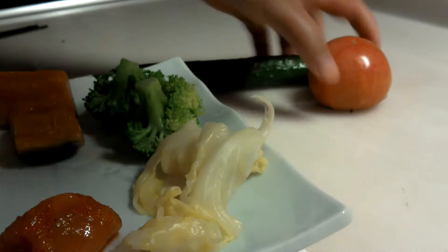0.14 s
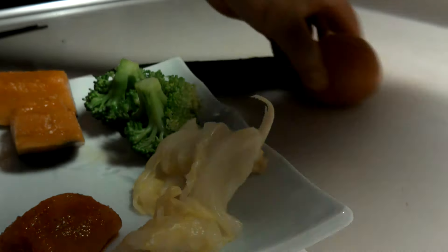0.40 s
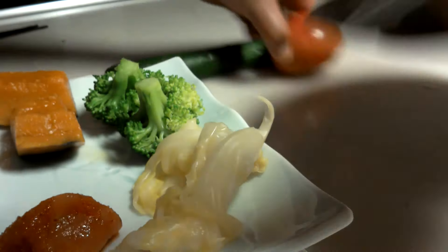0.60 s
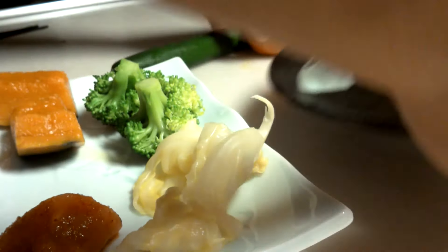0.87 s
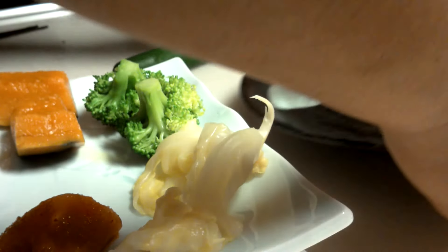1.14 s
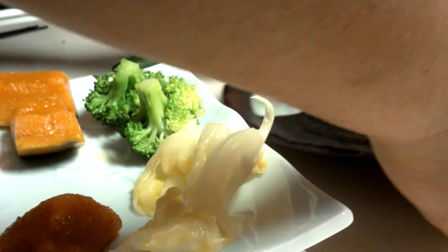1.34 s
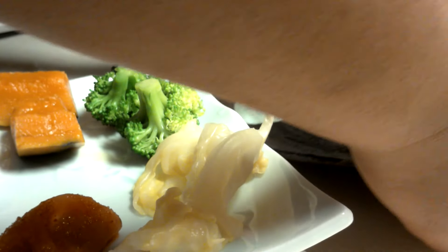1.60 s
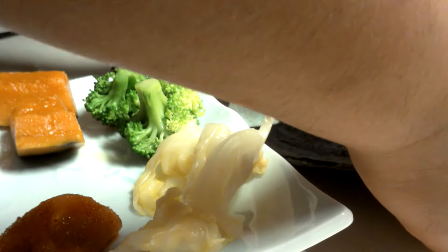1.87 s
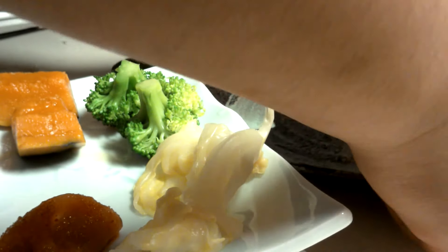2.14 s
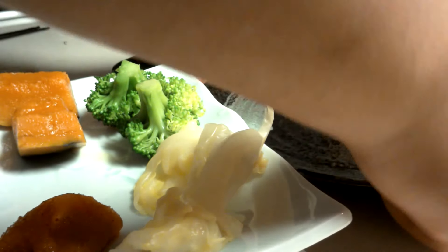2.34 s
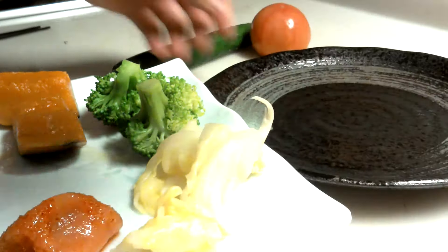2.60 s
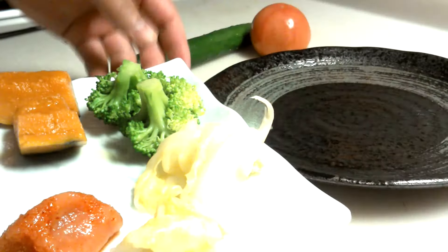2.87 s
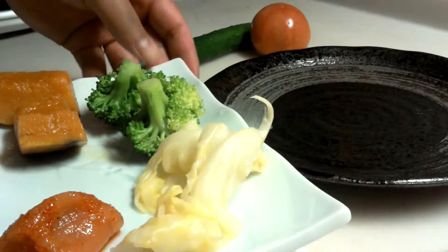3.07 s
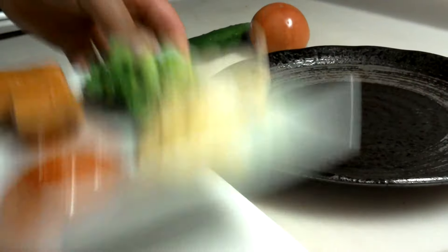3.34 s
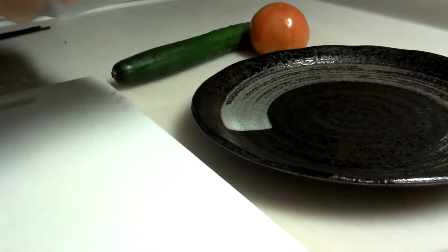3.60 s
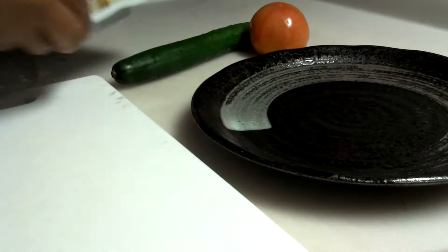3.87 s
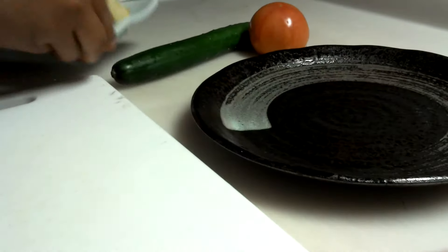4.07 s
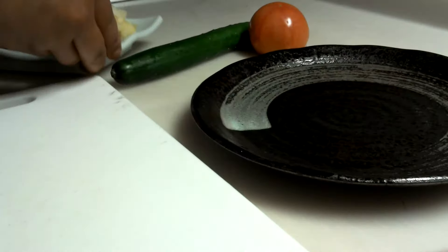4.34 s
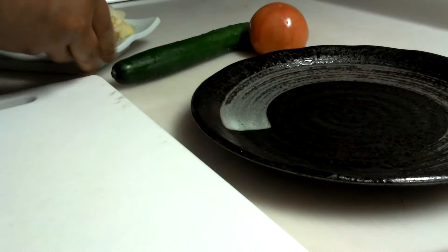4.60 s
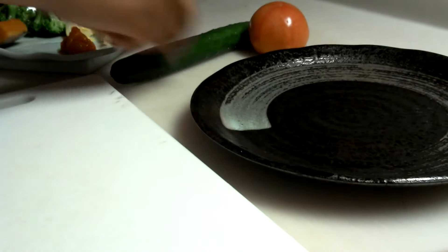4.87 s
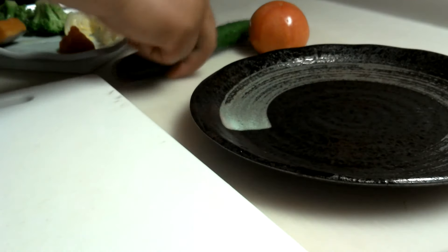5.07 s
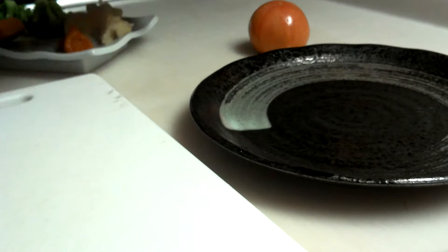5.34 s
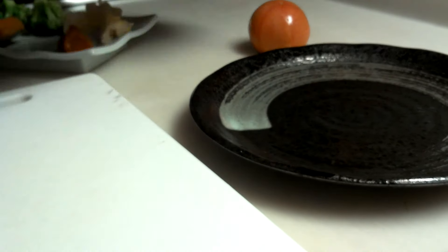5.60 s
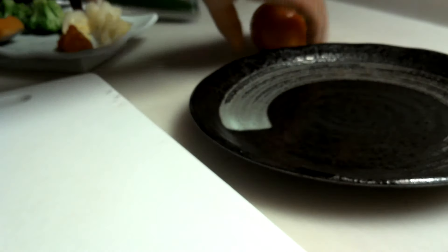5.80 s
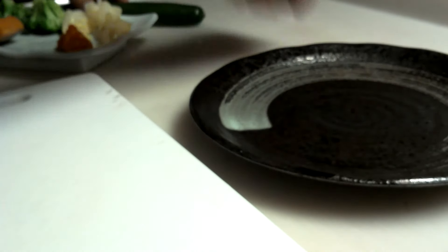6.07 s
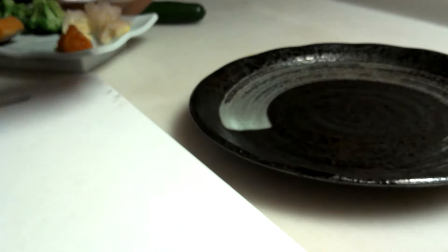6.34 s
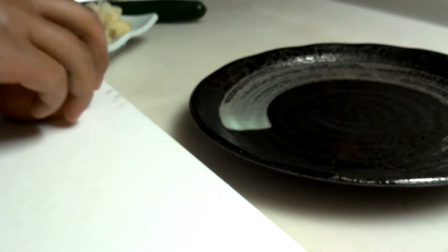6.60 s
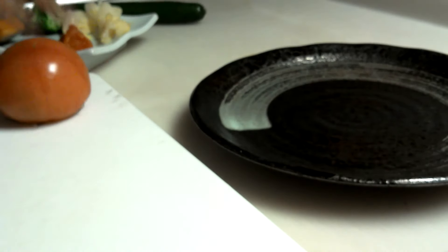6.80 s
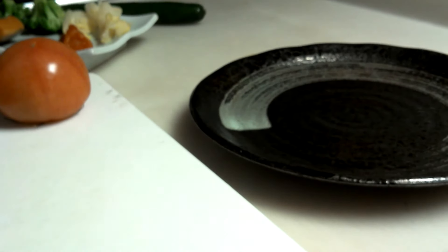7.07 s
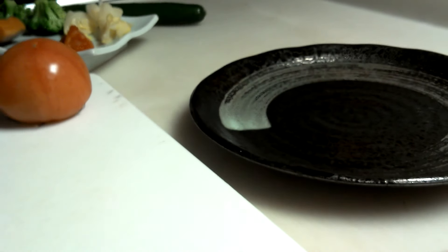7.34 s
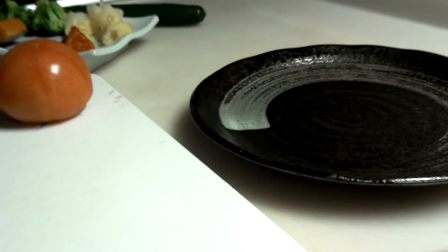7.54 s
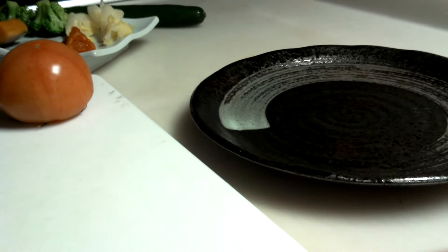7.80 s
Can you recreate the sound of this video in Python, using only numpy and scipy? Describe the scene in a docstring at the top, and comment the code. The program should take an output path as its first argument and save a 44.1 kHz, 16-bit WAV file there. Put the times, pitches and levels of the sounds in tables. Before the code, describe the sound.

Stoneware plate clacks onto a kitchen counter, then a porcelain dish lands with a sharper clatter, followed by soft thumps, ticks and scuffs over room rumble.

```python
"""Someone works at a kitchen counter, close to a small stereo microphone.
Light ticks and scuffs come first, then feet shift on the floor and a stoneware plate is set down.
A short squeak follows, then a porcelain dish lands; later come dull thumps of vegetables and hands,
with more ticks, footsteps and rubbing sleeves. Blows ring sets of dying tones; rubbing is shaped noise.
The room's rumble, hums and whine and the recorder's hiss, also made of noise and tones, run throughout."""
import sys
import numpy as np
from scipy import signal
from scipy.fft import rfft, irfft
from scipy.io import wavfile
from scipy.ndimage import uniform_filter1d

SR = 44100
rng = np.random.default_rng(int(sys.argv[2]) if len(sys.argv) > 2 else 0)


def gain_from_db(level_db):
    """Convert decibel levels to linear amplitude factors (20 dB per decade)."""
    decades = np.asarray(level_db, float) / 20
    return 10 ** decades


def pcm_store(signal):
    """Save signal as 16-bit PCM."""
    levels = np.round(np.clip(np.atleast_2d(signal), -1, 1) * 32767)
    wavfile.write(sys.argv[1], SR, levels.astype(np.int16).T)


N = 350109  # length in samples

# All levels are those before the echoes and the microphone's colour.
# Blows on plate, dish and hollow cupboard: t/s, rms level of the first 23 ms/dB, contact time/ms
PLATE_BLOWS = [(0.101, -56, 0.076), (1.86, -26, 0.088), (2.165, -40.5, 0.022), (2.192, -20, 0.051),
               (2.209, -21.5, 0.074), (2.227, -27.5, 0.11), (2.234, -22.5, 0.038)]
DISH_BLOWS = [(4.203, -15.5, 0.062), (4.207, -17.5, 0.048), (4.236, -30.5, 0.039), (4.374, -27.5, 0.19),
              (4.454, -38, 0.2), (4.578, -52.5, 0.061), (4.724, -43.5, 0.71)]
SOFT_BLOWS = [(5.79, -26.5, 0.45), (5.866, -39.5, 1), (5.966, -33, 1), (7.659, -38.5, 0.34),
              (7.749, -43.5, 0.35)]
# Ringing tones of each object: f/Hz, relative level/dB, time to fall by 60 dB/s
PLATE_TONES = [(552, -13.5, .052), (706.4, 2.5, 0.11), (745, -2, 0.05), (952, 8, 0.067), (988, 15.5, .022),
               (1100, 7.5, 0.073), (1216, -2, 0.046), (1380, -15.5, 0.06), (1600, -8.5, 0.036),
               (1750, -10.5, 0.093), (2191, -9, 0.14), (2218, -4, 0.1), (2498, -18, .08), (2980, -20, .05),
               (3362, -17, 0.09), (3480, -14, .045), (4480, -17, 0.08), (5023, -13, 0.06),
               (5884, -38, 0.13), (6907, -47, .15), (7900, -44.5, .1)]
DISH_TONES = [(627, 19, 0.044), (890, -8.5, 0.37), (900, 20.5, 0.013), (1058, 10.5, 0.066),
              (1354, 11, 0.05), (1593, -23.5, 0.15), (1922, -6.5, 0.23), (2277, -23, 0.19),
              (2380, -22, .07), (2563, -14, 0.13), (2860, -24, .15), (3440, -34, .15), (3500, -34, 0.13),
              (3900, -29, .1), (4840, -33, .05), (5900, -47, .04)]
COUNTER_TONES = [(114.8, -4, 0.12), (246, 2.5, 0.11), (294, 4, 0.16), (374, 2, 0.063), (431, -4, 0.029),
                 (439, -15.5, 0.091), (534, -20.5, 0.13), (607.7, 2.5, 0.089)]
CUPBOARD_TONES = [(178.5, -4, 0.12), (255, 0, 0.12), (472, -13, 0.28), (515, -17, 0.046)]  # hollow box under the counter
# Tones of a dry crack: f/Hz, relative level/dB, time to fall by 60 dB/s
CRACK_TONES = [(1600, 1, 0.0052), (2327, 2.5, 0.028), (2900, -1.5, 0.017), (3930, 2.5, 0.0022),
               (4350, -7.5, 0.01), (5130, -7.5, 0.017), (6050, -9, 0.0053)]
# Clattering surroundings: f/Hz, relative level of one tone/dB
CLATTER_LEVEL = [(120, -27.5), (200, -5.5), (300, -5.5), (600, -8), (1000, -5.5), (1600, -4), (2600, -18.5),
                 (4000, -32), (6000, -30.5), (8500, -61.5)]
# Clattering surroundings: f/Hz, time to fall by 60 dB/s
CLATTER_FADE = [(150, 0.066), (500, 0.2), (1500, 0.04), (4000, 0.089), (8000, 0.11)]
# Small ticks of fingers and rims: t/s, knock peak level/dB, knock f/Hz, crack peak level/dB, slip time/ms
TICKS = [(0.247, -53, 4150, -56, .3), (0.3, -56, 3630, -60, .3), (0.33, -53, 3310, -63, .3),
         (0.367, -38.5, 890, -42, 0.33), (0.461, -52, 2490, -57, 1), (0.521, -39, 2360, -40, 0.26),
         (0.616, -47, 3020, -56, 0.77), (2.232, -38.5, 1320, -34.5, 0.41), (2.369, -37, 700, -47, .6),
         (2.851, -49.5, 2740, -50, 9), (3.068, -30, 645, -41, 1.25), (3.705, -40.5, 660, -44.5, 1.9),
         (3.861, -39.5, 627, -43, 1.2), (5.195, -42.5, 1060, -41.5, 0.95), (5.514, -37.5, 2230, -37, 0.85),
         (5.533, -43, 1110, -43, 0.61), (5.788, -39, 656, -51, 1.6), (5.968, -37.5, 640, -41, 1.3),
         (6.118, -40, 640, -46.5, 1.3), (6.282, -47, 900, -50.5, 1.3), (6.341, -30, 1190, -37, 0.39),
         (6.364, -36.5, 1310, -46, 2.7), (6.438, -43, 1150, -57, 4), (6.636, -34, 900, -36.5, 2.3),
         (6.771, -35, 1180, -51, 1.3), (7.022, -42, 1210, -55, 2.3), (7.034, -43, 1200, -58, 1.8),
         (7.043, -34, 1130, -46, 1.3), (7.083, -51, 1100, -48, 3), (7.105, -53, 1100, -48, 0.85),
         (7.13, -39, 785, -34.5, 8), (7.178, -37, 870, -46, 1.1), (7.188, -34.5, 814, -53, 1.4),
         (7.228, -39, 820, -44, 1.3), (7.255, -44, 580, -46, 1), (7.304, -44, 1130, -42, 1.9)]
# Rubbing strokes: peak t/s, rms level/dB, rise/s, fade/s, brightness/dB per octave, hollow tone f/Hz
STROKES = [(0.11, -59, .15, 0.099, 2.5, 4800), (0.37, -60.5, 0.014, 0.55, 0.5, 2330),
           (0.6, -60, 0.24, 0.067, -3, 2900), (2.87, -54, 0.11, 0.088, -7.5, 2900),
           (2.91, -50.5, 0.064, 0.038, -9, 2200), (3.073, -43.5, 0.0097, 0.018, -3, 1600),
           (3.867, -55, 0.072, 0.062, 0, 2700), (4.465, -44.5, 0.017, 0.044, -11, 2400),
           (5.2, -54, .01, 0.065, -7, 1400), (5.515, -50, 0.012, 0.061, -3, 2210),
           (5.981, -38.5, 0.014, 0.14, -8.5, 2620), (6.026, -43.5, 0.04, 0.039, -2.5, 790),
           (6.119, -42, 0.08, 0.057, -8.5, 1300), (6.35, -41.5, 0.016, 0.13, -6.5, 1310),
           (6.65, -50.5, 0.16, 0.091, -8, 2300), (6.78, -45, 0.02, 0.057, -9, 1200),
           (6.84, -46, 0.043, 0.055, -7, 1200), (7.04, -49.5, 0.04, 0.086, -12.5, 1200),
           (7.141, -48.5, 0.08, 0.048, 0, 2670), (7.19, -48.5, 0.075, 0.17, -2, 800),
           (7.266, -54, 0.0123, 0.056, 6.5, 5230), (7.312, -49, 0.017, 0.04, 0.5, 1200),
           (7.587, -32, 0.02, 0.11, 3, 1600), (7.75, -54, 0.44, 0.73, 2.5, 5500)]
# Basic colour of rubbing: f/Hz, relative level/dB per Hz
RUB_COLOUR = [(120, -52), (250, 2.5), (400, -11), (764, -4.5), (1150, -5.5), (1580, -7), (3030, -11.5),
              (3400, -15.5), (5100, -21), (8000, -31.5), (12000, -33), (16000, -53)]
# Feet on the floor: t/s, peak level/dB, f/Hz, time to fall by 60 dB/s
STEPS = [(0.921, -30.5, 101.7, 0.15), (1.426, -39, 118, 0.14), (6.5, -30, 68.5, 0.077),
         (7.302, -29, 125.6, 0.098), (7.641, -30.5, 141, 0.3)]
# Faint short squeak: middle t/s, length/s, f/Hz, peak level/dB
SQUEAK = (3.6, .14, 1190, -62)
# Echoes of the kitchen: f/Hz, time to fall by 60 dB/s
ECHO_FADE = [(120, 0.61), (300, 0.26), (1000, 0.4), (2500, 0.35), (6000, 0.54)]
# Colour of the room's rumble: f/Hz, relative level/dB per Hz
ROOM_COLOUR = [(12, -26.5), (25, -1.5), (40, -5), (50, 3.5), (68, -14), (113, 0), (166, -19), (203, -10.5),
               (330, -20), (600, -27), (1050, -34.5), (8000, -53.5), (10400, -54)]
# Hums of the room: f/Hz, rms level without wavering/dB
HUMS = [(48.4, -77.5), (118.4, -58), (199.2, -62)]
# Fuzzy motor bands: middle f/Hz, distance to the -40 dB points/Hz, rms level/dB
WHINE = [(1200, 120, -73), (1410, 55, -77)]
# Colour of the recorder's hiss: f/Hz, relative level/dB per Hz
HISS_COLOUR = [(10500, -58.5), (11500, -46), (11800, -33.5), (13200, -20), (15100, -6.5), (15900, -5)]
# Likeness of left and right: f/Hz, correlation (1 = the same)
LIKENESS = [(60, 0.99), (180, 0.95), (550, 0.88), (1650, 0.42), (4970, 0.031), (15000, -0.029)]
# How the ringing leans to one side: f/Hz, left minus right level/dB
RING_LEAN = [(1100, 1), (2200, -6.5), (4000, 3.5)]
# Colour of the microphone: f/Hz, gain/dB
MIC_COLOUR = [(40, -2.5), (7000, 5), (8200, -1.5), (9000, -18), (10000, -59), (11200, -34.5), (12500, -6.5),
              (15500, 17.5)]
# Uneven sides of the microphone: f/Hz, left minus right gain/dB
MIC_LEAN = [(60, 0.8), (400, 2.06), (1000, 2), (2400, 1), (5000, -9), (9000, 14.5), (15000, 1.5)]


def evened(x):
    """Scales to rms 1."""
    return x / np.sqrt(np.mean(x ** 2) + 1e-20)


def read(points, hz):
    """Reads a spectrum table on a log-frequency axis."""
    f, value = np.transpose(points)
    return np.interp(np.log(hz + 1), np.log(f + 1), value)


def add(mix, s, sound, pan_db):
    """Mixes a sound in at time s; a positive pan leans left."""
    part = mix[:, round(s * SR):][:, :sound.shape[-1]]
    sides = gain_from_db(np.array([[pan_db / 2], [-pan_db / 2]]))
    part += sound[..., :part.shape[1]] * sides


def noise(colour, size, field_db=lambda t, hz: 0, patchy_db=4.0):
    """Stereo noise from random short-time spectra, most alike in the bass, with drifting patches."""
    frames = 4 * N // size + 5
    hz = np.fft.rfftfreq(size, 1 / SR)[:, None]
    t = np.arange(frames) * size / 4 / SR
    a, b, c, d, patches = rng.standard_normal((frames, len(hz), 5)).T
    patches = uniform_filter1d(patches, size=6, axis=0)
    patches = evened(uniform_filter1d(patches, size=8, axis=1))
    same = np.clip(read(LIKENESS, hz), -1, 1)
    left = a + 1j * b
    right = same * left + np.sqrt(1 - same ** 2) * (c + 1j * d)
    level_db = read(colour, hz) + field_db(t, hz) + patchy_db * patches
    spectra = np.array([left, right]) * gain_from_db(level_db)
    return signal.istft(spectra, nperseg=size, noverlap=3 * size // 4)[1][:, :N]


def ring(modes):
    """Rings dying sines: the spot struck sets each share, and each leans its own way between the sides."""
    hz, db, t60 = np.transpose(modes)[:, :, None]
    t = np.arange(SR // 4) / SR
    spot, beam = rng.standard_normal((2, *hz.shape))
    # Neighbours swing opposite ways.
    share = gain_from_db(db + 2 * spot) * (-1) ** np.arange(len(hz))[:, None]
    # The less alike the sides are at a pitch, the more its lean varies.
    lean_db = read(RING_LEAN, hz) + 8.4 * (1 - read(LIKENESS, hz)) * beam
    sides = gain_from_db(np.outer([.5, -.5], lean_db))
    swell = 1 - np.exp(-t * hz / 0.16)  # nearly full within a cycle
    tones = swell * gain_from_db(-60 * t / t60) * np.sin(2 * np.pi * hz * t)
    return sides @ (share * tones)


def blows(mix, rows, ware, counter_db, clatter_db, pan_db):
    """A contact push rings ware, counter and surroundings: the longer the contact, the duller."""
    t_ms = np.arange(400) * 1000 / SR
    for s, db, contact_ms in rows:
        push = t_ms * np.exp(-t_ms / max(contact_ms, .02))
        ringing = ring(ware) + gain_from_db(counter_db) * ring(COUNTER_TONES) + gain_from_db(clatter_db) * clatter()
        sound = signal.fftconvolve(ringing, push[None], axes=1)
        loudness = np.sqrt(np.mean(sound[:, :1000] ** 2))  # first 23 ms
        add(mix, s, gain_from_db(db) * sound / loudness, pan_db)


def clatter():
    """Shelves and loose crockery answer with a dense, evenly spread crowd of unrelated tones."""
    place = rng.permutation(np.arange(140) + rng.random(140)) / 140
    hz = 120 * 70 ** place  # 120 to 8400 Hz
    return ring(np.transpose([hz, read(CLATTER_LEVEL, hz), read(CLATTER_FADE, hz)]))


def ticks(mix):
    """Rough slips set off a knock and a dry crack of quickly dying tones: longer slips sound duller."""
    t_ms = np.arange(900) * 1000 / SR
    dull_db = 2  # treble lost per octave each time the slip time doubles
    for s, knock_db, knock_hz, crack_db, slip_ms in TICKS:
        knock = ring([(knock_hz, 0, .035), (knock_hz * 0.51, -6, .025),
                      (knock_hz * 1.1, -5, .02), (knock_hz * 1.78, -8, .02)])
        tilt_db = -dull_db * np.log2(slip_ms)
        crack = ring([(hz, db + tilt_db * np.log2(hz / 2300), t60) for hz, db, t60 in CRACK_TONES])
        slips = rng.standard_normal(len(t_ms)) * np.exp(-t_ms / slip_ms)
        for part, db in ((knock, knock_db), (crack, crack_db)):
            sound = signal.fftconvolve(part[:, :3000], slips[None], axes=1)
            add(mix, s, gain_from_db(db) * sound / abs(sound).max(), 0)


def scuffs():
    """Rubbing is noise with clumped slips; each stroke swells, fades and lends its own colour."""
    s, db, rise, fade, tilt_db, tone_hz = np.transpose(STROKES)[:, :, None]
    span_db, roundness, hollow_db = 18, 1.04, 5.5  # drop over one rise or fade, curve, lift at the tone

    def power(t):
        distance = np.maximum((s - t) / rise, (t - s) / fade)
        return gain_from_db(db - span_db * distance ** roundness) ** 2 + 1e-30

    def colour_db(t, hz):
        hollow = hollow_db * np.exp(-(np.log2((hz + 1) / tone_hz.T) / .3) ** 2)
        tilt = tilt_db.T * np.log2(hz / 1500 + 1.0)
        return (tilt + hollow) @ (power(t) / power(t).sum(0))  # the louder stroke counts more

    rub = noise(RUB_COLOUR, size=256, field_db=colour_db, patchy_db=2.5)
    steady = rub / np.sqrt(uniform_filter1d((rub ** 2).mean(0), size=4096))
    jumps_db = 1.62 * np.minimum(rng.exponential(1, N // 128 + 1), 4)
    slips = uniform_filter1d(gain_from_db(jumps_db).repeat(128)[:N], size=64)
    level = np.sqrt(power(np.arange(0, N, 32) / SR).sum(0)).repeat(32)[:N]
    return level * steady * evened(slips)


def steps(mix):
    """Each foot makes the floor boom softly: a low tone that swells, then dies away."""
    t = np.arange(SR // 3) / SR
    for s, db, hz, t60 in STEPS:
        swell = 1 - np.exp(-t / 0.011)
        boom = swell * gain_from_db(-60 * t / t60) * np.sin(2 * np.pi * hz * t)
        add(mix, s, gain_from_db(db) * boom / abs(boom).max(), 0)


def squeak(mix):
    """A tone of wavering pitch swells and fades."""
    s, length, hz, db = SQUEAK
    t = np.arange(0, length, 1 / SR)
    waver_hz = 40.0 * evened(uniform_filter1d(rng.standard_normal(len(t)), size=300))
    tone = np.sin(2 * np.pi * np.cumsum(hz + waver_hz) / SR)
    add(mix, s - length / 2, gain_from_db(db) * np.sin(np.pi * t / length) * tone, 0)


def kitchen(x):
    """Sparse echoes of random sign die at their own speed in each band, partly different on each side."""
    taps = np.zeros((2, SR // 2))
    at = np.arange(120, SR // 2 - 20, 20) + rng.integers(0, 20, (2, (SR // 2 - 121) // 20))
    np.put_along_axis(taps, at, rng.choice([-1., 1.], at.shape), 1)
    hz, t, z = signal.stft(taps, SR, nperseg=256)
    same = np.clip(read(LIKENESS, hz), 0, 1)[:, None] ** 0.67  # more alike than the noises
    z = np.array([z[0], same * z[0] + np.sqrt(1 - same ** 2) * z[1]])
    fading = gain_from_db(-60 * t / read(ECHO_FADE, hz)[:, None])
    tail = signal.istft(z * fading, SR, nperseg=256)[1]
    return signal.fftconvolve(x.mean(0)[None], tail / np.linalg.norm(tail[0]), axes=1)[:, :N]


def room_tone():
    """Low rumbling noise of the house, hums wavering in level and pitch, and a faint motor whine."""
    t = np.arange(N) / SR
    sound = gain_from_db(-44.5) * evened(noise(ROOM_COLOUR, size=2048, patchy_db=1.2))
    for hz, db in HUMS:
        wander = evened(uniform_filter1d(rng.standard_normal(N), size=3000))
        turns = hz * t + np.cumsum(4.16 * wander) / SR  # pitch wavers by 4.16 Hz rms
        sound = sound + np.sqrt(2) * gain_from_db(db + 1.6 * wander) * np.sin(2 * np.pi * turns)
    for hz, width, db in WHINE:
        band = [(hz - width, -40), (hz, 0), (hz + width, -40), (20000, -200)]
        sound = sound + gain_from_db(db) * evened(noise(band, size=2048))
    return sound


def recorder_hiss():
    """The recorder adds steady high noise."""
    return gain_from_db(-58.5) * evened(noise(HISS_COLOUR, size=512))


def scene():
    """Blows, ticks, steps, scuffs and a squeak, with their echoes, over the room's own sound."""
    near = scuffs()
    blows(near, PLATE_BLOWS, PLATE_TONES, counter_db=-4.5, clatter_db=-1.5, pan_db=-1.0)
    blows(near, DISH_BLOWS, DISH_TONES, counter_db=9.0, clatter_db=2.5, pan_db=-0.3)
    blows(near, SOFT_BLOWS, CUPBOARD_TONES, counter_db=-1.0, clatter_db=-3.0, pan_db=-0.5)
    ticks(near)
    steps(near)
    squeak(near)
    near[0] = np.roll(near[0], 2)  # the left side hears 2 samples later
    return near + gain_from_db(-5.0) * kitchen(near) + room_tone()


def band_limit(x):
    """A steep low-pass at the top of the band."""
    return signal.sosfilt(signal.butter(12, 16940, fs=SR, output="sos"), x)


def record(dry):
    """The microphone colours each side, with a deep treble notch; hiss and a treble limit follow."""
    hz = np.fft.rfftfreq(N, 1 / SR)
    sides = gain_from_db(read(MIC_COLOUR, hz) + np.outer([.5, -.5], read(MIC_LEAN, hz)))
    heard = irfft(rfft(dry, axis=1) * sides, N, axis=1) + recorder_hiss()
    limited = irfft(rfft(heard, axis=1) * (hz < 15800), N, axis=1)
    return band_limit(limited)


dry = scene()
out = record(dry)
pcm_store(out)
```